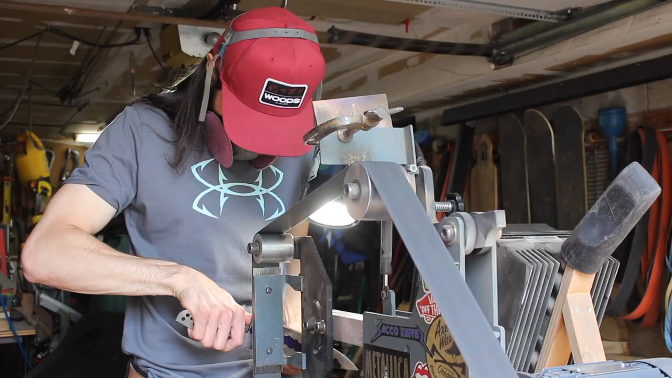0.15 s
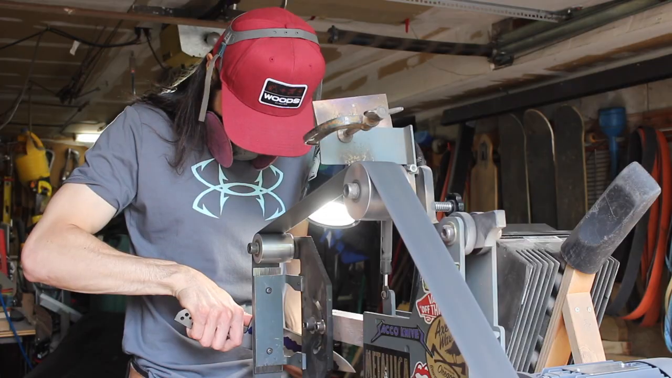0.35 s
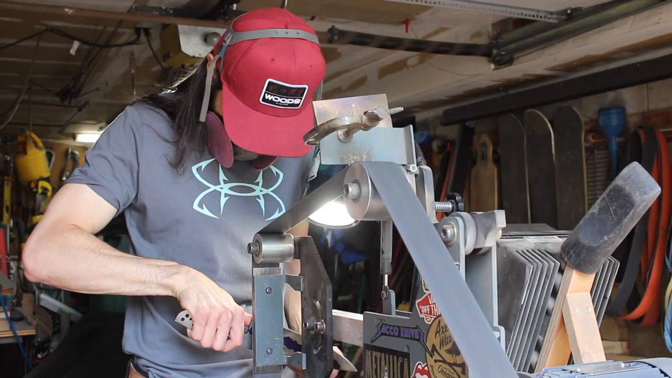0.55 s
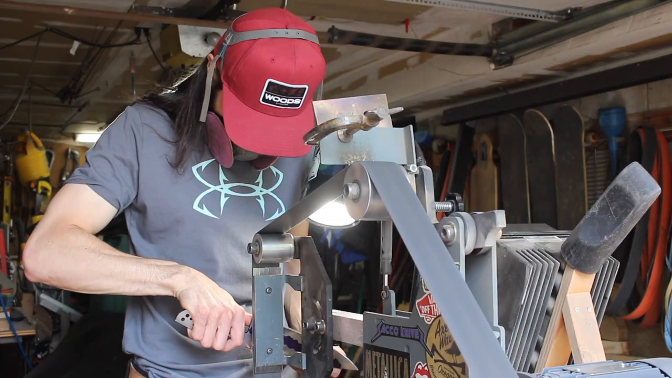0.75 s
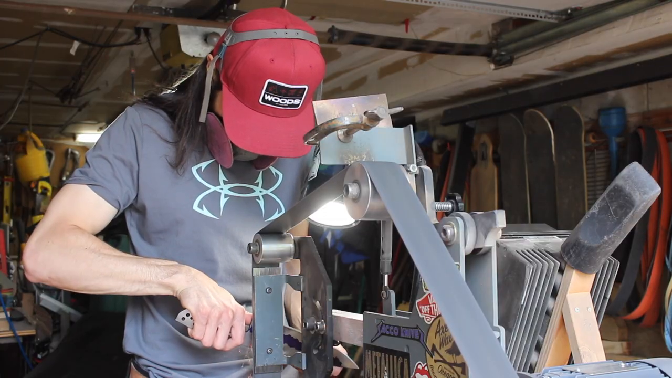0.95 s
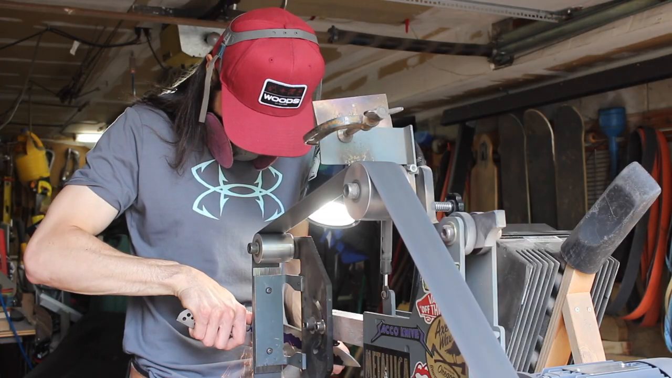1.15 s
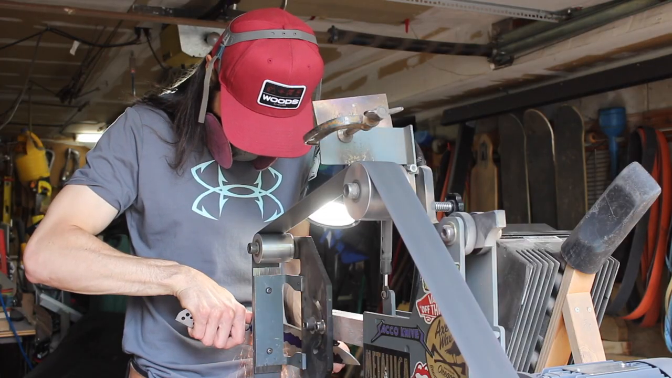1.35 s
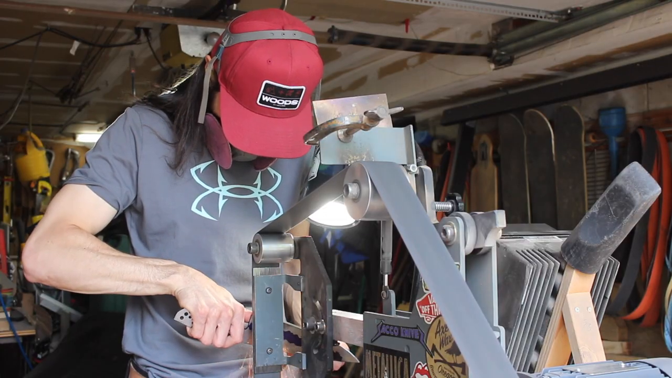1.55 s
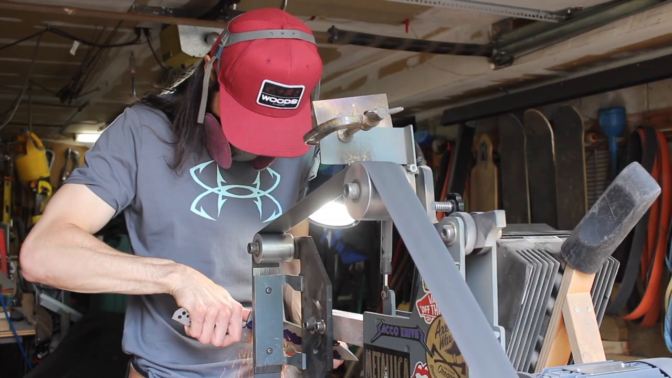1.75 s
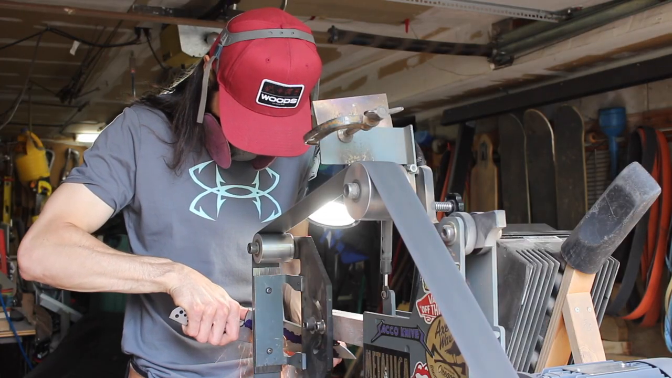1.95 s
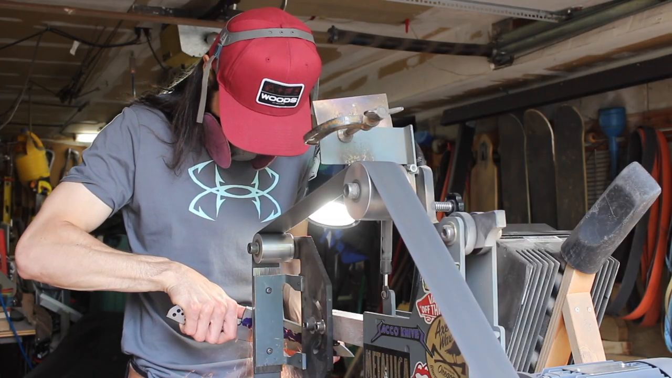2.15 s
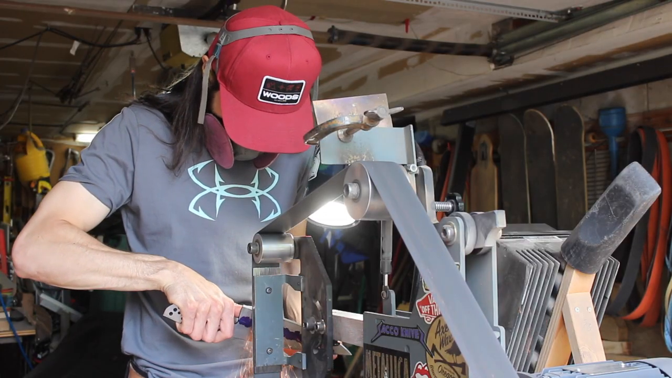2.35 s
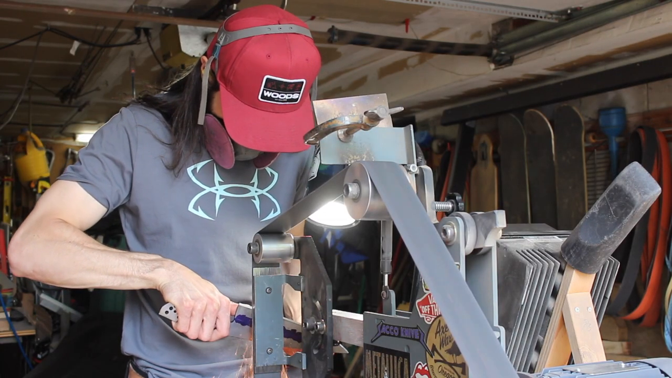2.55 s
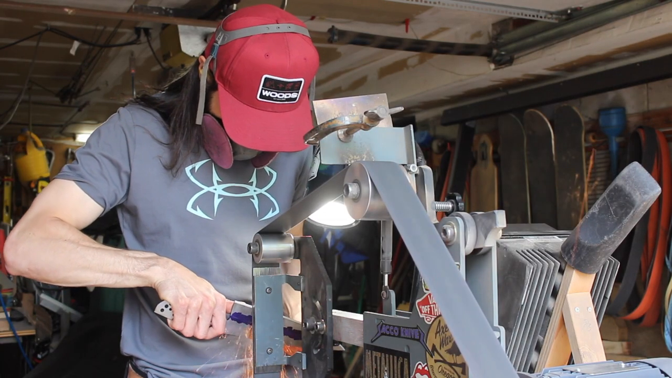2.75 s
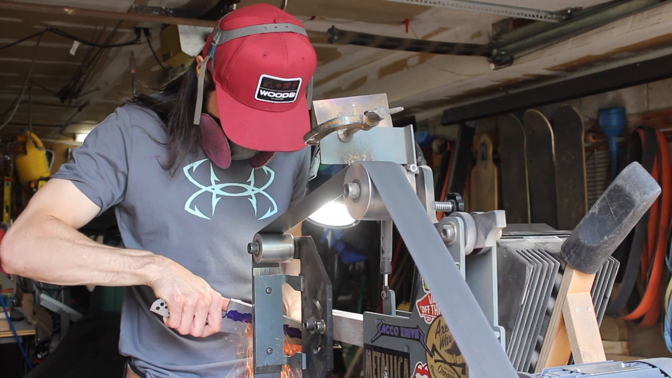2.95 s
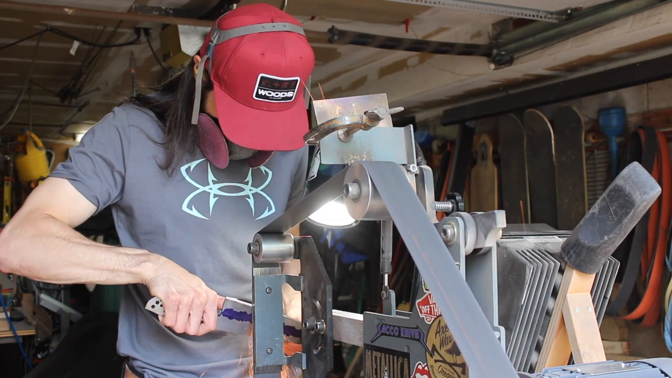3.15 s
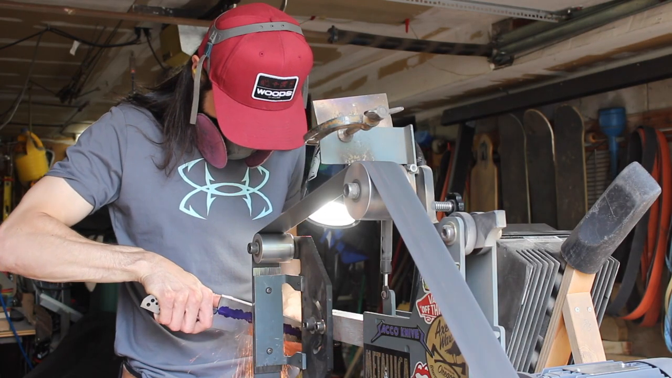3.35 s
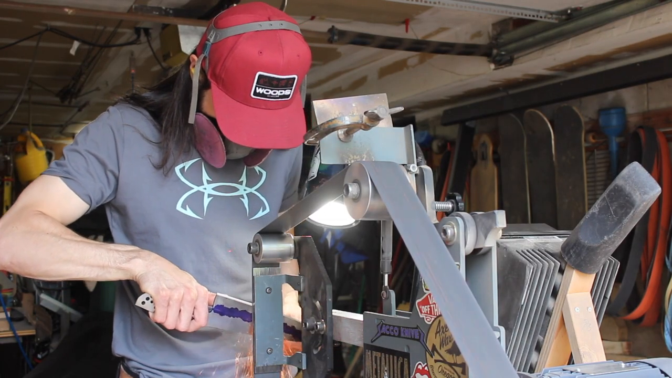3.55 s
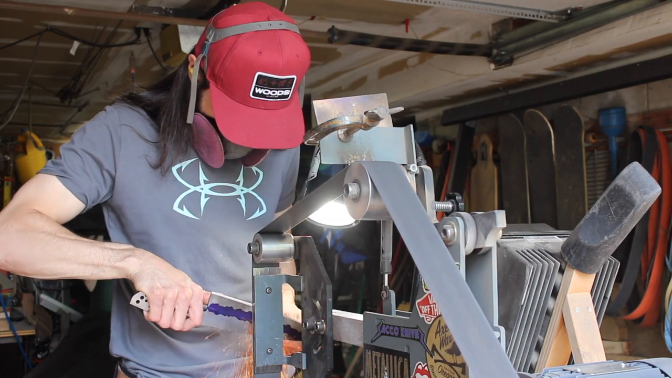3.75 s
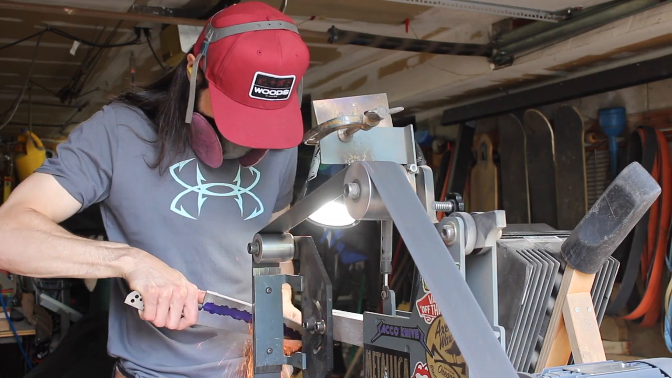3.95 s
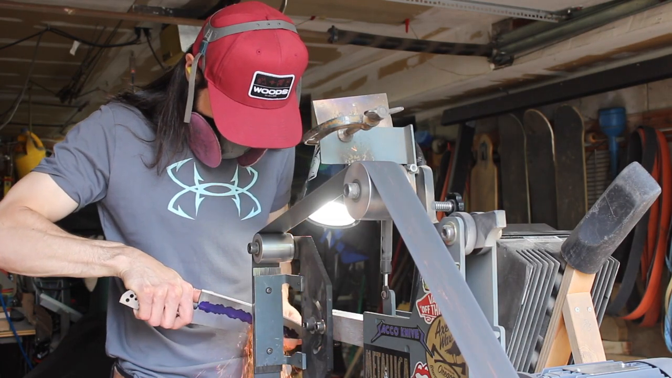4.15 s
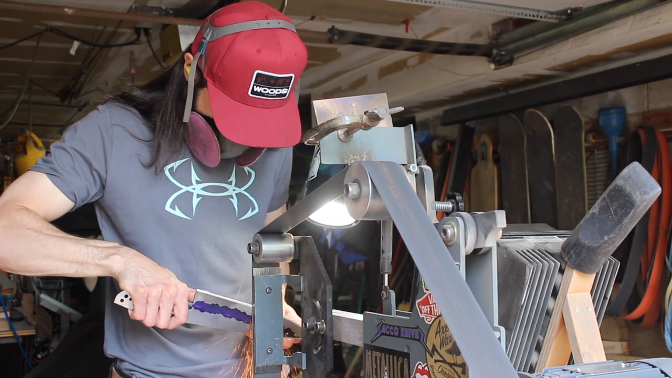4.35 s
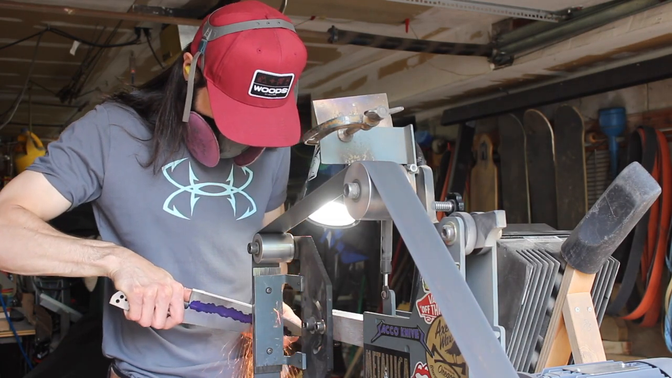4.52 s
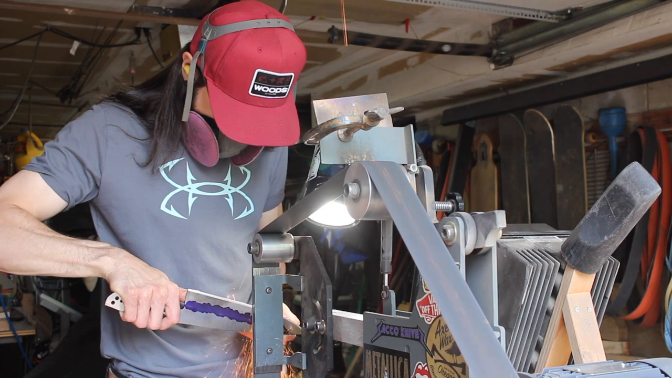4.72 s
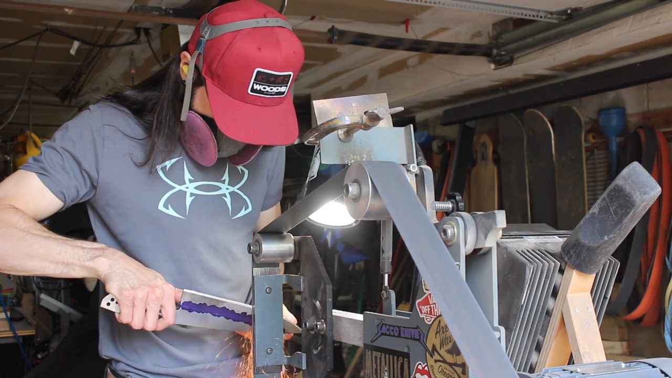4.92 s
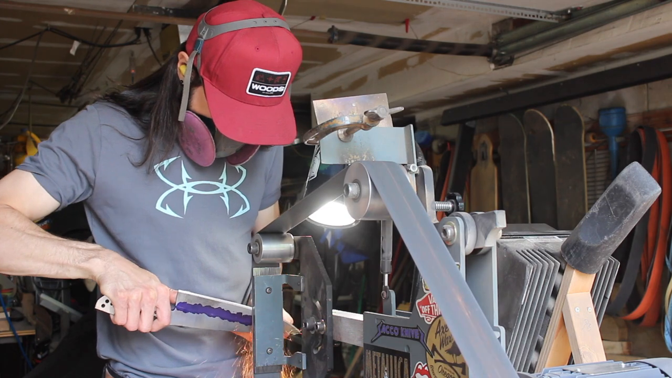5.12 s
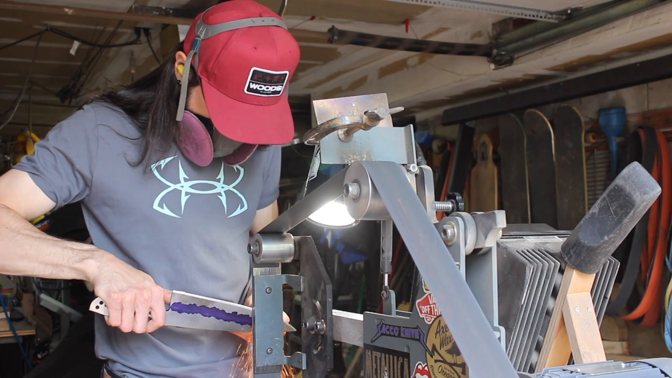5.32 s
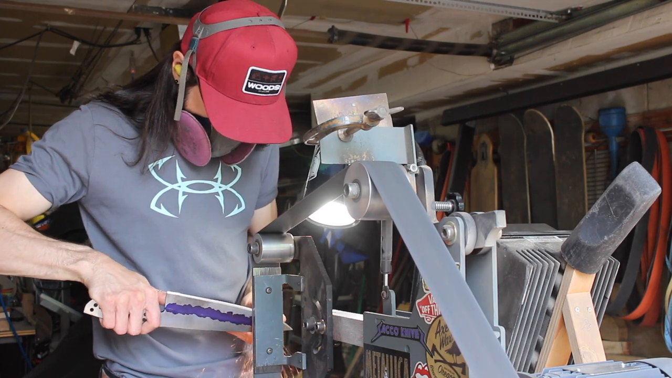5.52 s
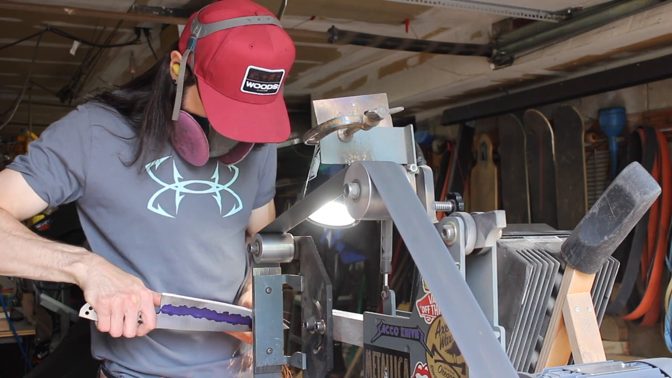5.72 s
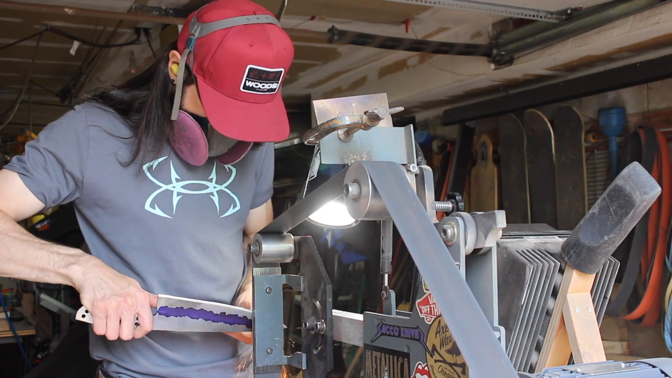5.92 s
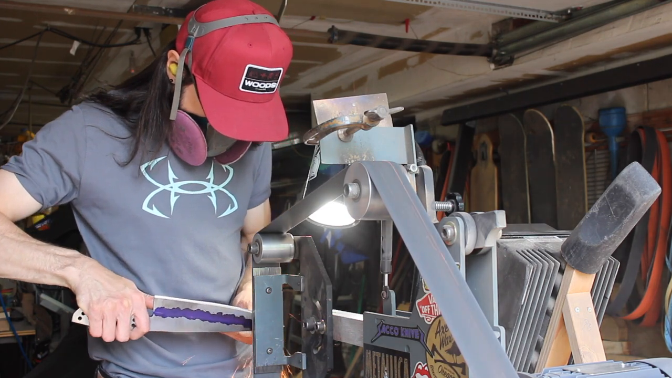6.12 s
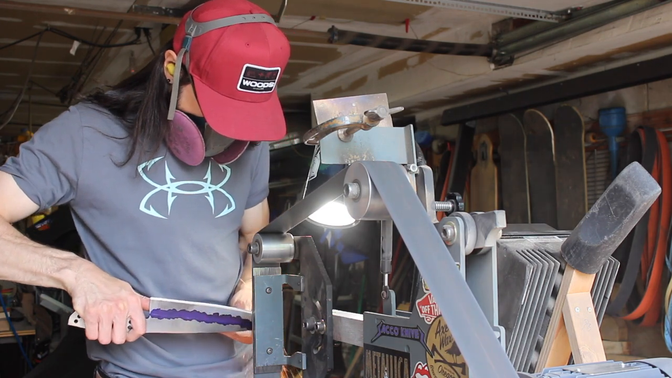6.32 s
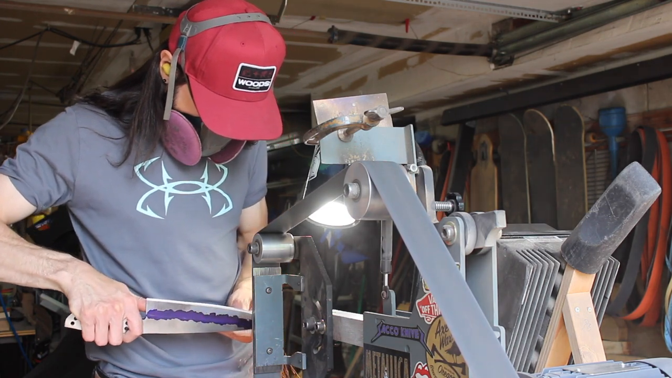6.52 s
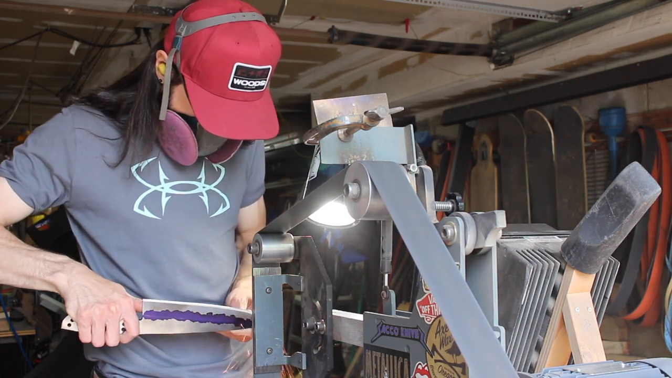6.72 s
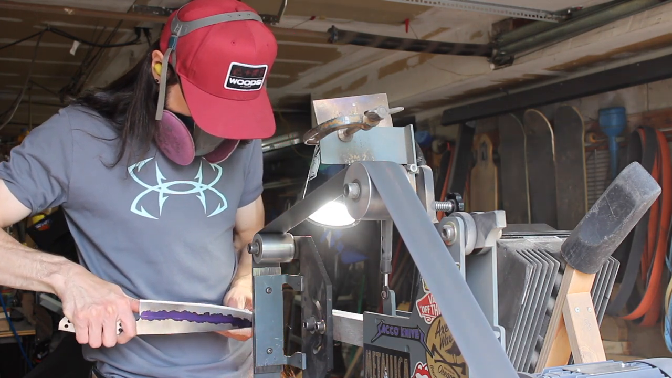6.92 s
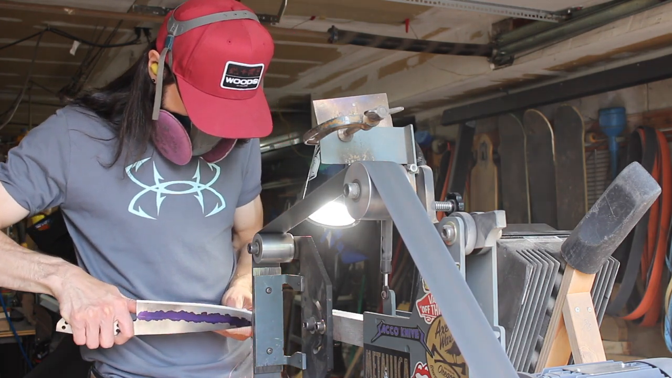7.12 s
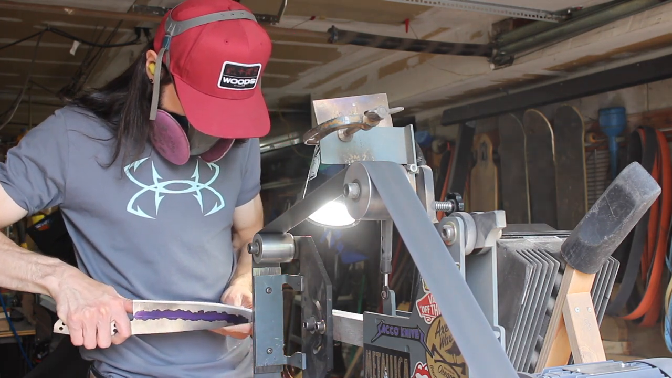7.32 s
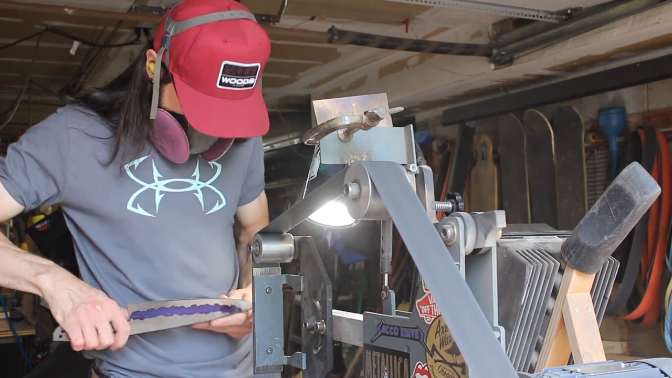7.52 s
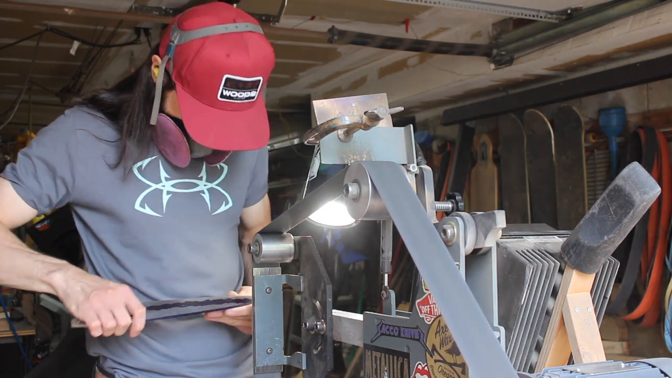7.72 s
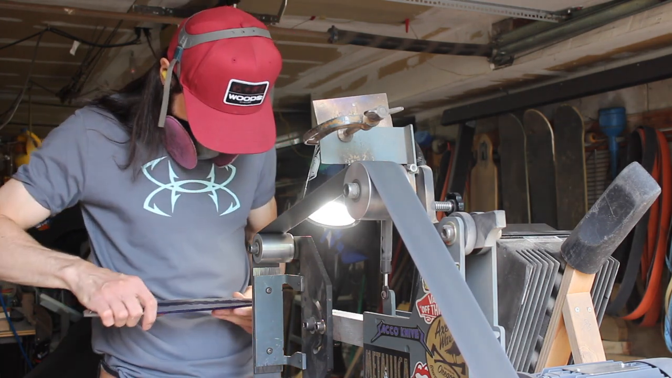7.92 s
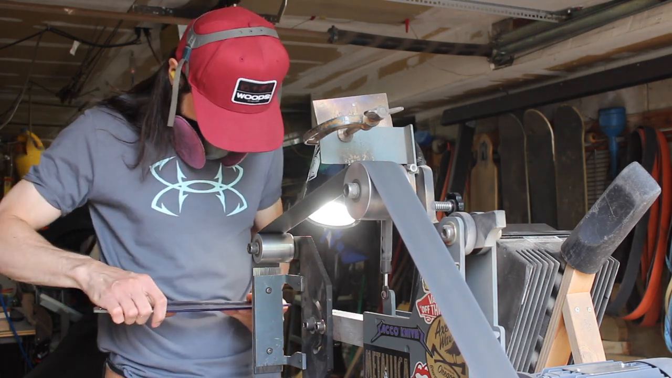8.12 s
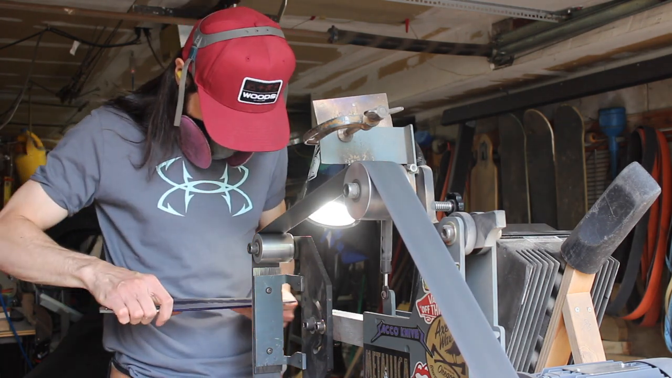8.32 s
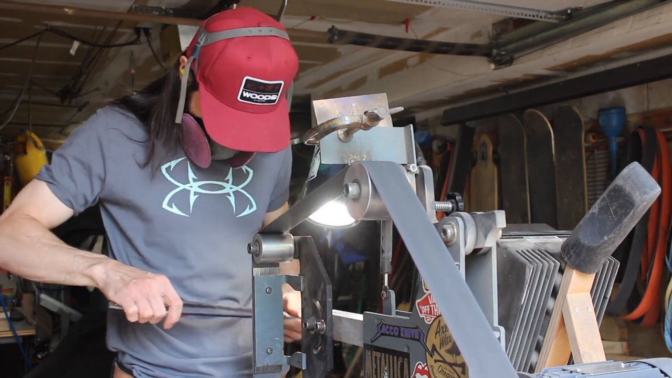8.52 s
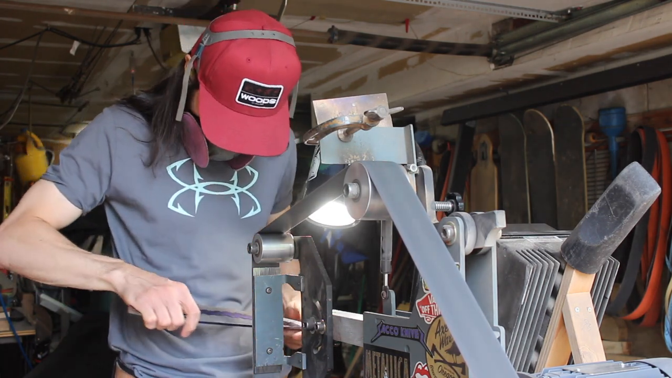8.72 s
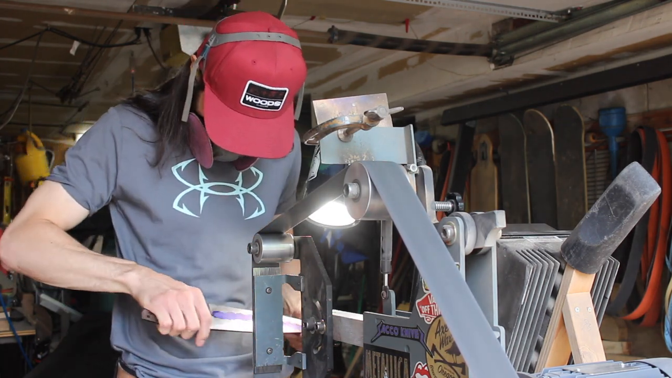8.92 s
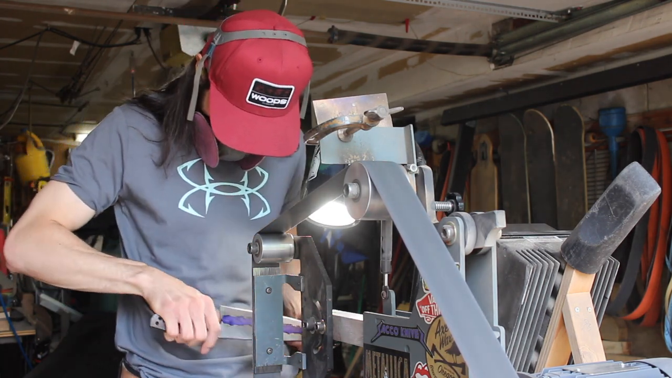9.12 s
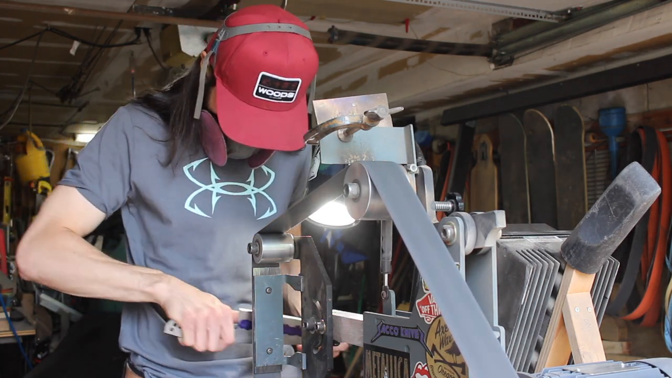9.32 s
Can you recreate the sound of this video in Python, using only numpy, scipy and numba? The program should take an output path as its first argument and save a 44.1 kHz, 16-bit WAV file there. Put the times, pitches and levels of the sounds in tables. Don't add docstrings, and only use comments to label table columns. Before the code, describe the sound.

Close, dry and almost mono: a belt machine whirs and hisses, its seam ticking about nine times a second. Short narrow scrapes lead into sustained harsh grinding of a knife, bright and sizzling, with resonant steel tones that swell and dip as the blade slides across. The grinding stops at once; the belt's hiss, faint hum and low air gusts on the microphone remain.

```python
import sys
import numpy as np
from scipy import signal
from scipy.fft import rfft, irfft, next_fast_len
from scipy.io import wavfile
from scipy.ndimage import uniform_filter1d
from numba import njit

SR = 44100
rng = np.random.default_rng(int(sys.argv[2]) if len(sys.argv) > 2 else 0)


def put_to_file(sound):
    columns = np.atleast_2d(sound).T
    safe = np.clip(columns, -1, 1)
    whole_steps = np.round(safe * 32767)
    wavfile.write(sys.argv[1], SR, whole_steps.astype(np.int16))


def rack_gain(trim_db):
    fader = np.asarray(trim_db, float)
    return 10 ** (fader / 20)


N = 417627
T_S = np.arange(N) / SR


def rms_one(x):
    return x / np.sqrt(np.mean(x ** 2) + 1e-20)


def in_time(rows):
    s, *columns = np.transpose(rows)
    return [np.interp(T_S, s, c) for c in columns]


def at_hz(points, hz):
    table_hz, value = np.array(points).T
    return np.interp(np.log(hz), np.log(table_hz), value)


def coloured(x, gain):
    size = next_fast_len(N)
    hz = np.fft.rfftfreq(size, 1 / SR) + 1
    return irfft(rfft(x, size) * gain(hz))[:N]


def resonance(x, hz, width_hz):
    r, w = np.exp(-np.pi * width_hz / SR), 2 * np.pi * hz / SR
    return rms_one(signal.lfilter([1, 0, -1], [1, -2 * r * np.cos(w), r * r], x))


def sine(level_db, phase):
    return np.sqrt(2) * rack_gain(level_db) * np.sin(phase)


# t/s, rate/(turns/s)
BELT = [
    (0, 8.745),
    (1.1, 8.75),
    (1.7, 8.85),
    (2.7, 8.93),
    (5.5, 8.93),
    (6.2, 8.915),
    (7.4, 8.92),
    (7.6, 8.745),
    (9.47, 8.74),
]


def belt_rate():
    return in_time(BELT)[0]


def belt_lag():
    return (SR / belt_rate()).astype(np.int64)


# t/s, level/dB
GAIN = [(0, 0), (.33, -3.5), (.65, 0), (.9, -3), (1.2, -3.5), (3, -4.5), (5, -5.5), (6, -7), (6.8, -6),
        (7.45, -7), (7.9, 0), (8.15, 1), (9.47, 0.5)]


def gain_db():
    return in_time(GAIN)[0]


@njit
def recur(fresh, lag, kept):
    out = fresh.copy()
    for i in range(lag.max(), len(out)):
        out[i] = kept * out[i - lag[i]] + np.sqrt(1 - kept * kept) * fresh[i]
    return out


# f/Hz, share/1
REPEATS = [(200, 0.54), (1000, 0.6865), (2200, 0.89), (3400, 0.93), (5500, 0.11), (11000, 0.041)]


def grit(kept, rough_db):
    lag = belt_lag()
    fresh, loose, lumps = rng.standard_normal((3, N))
    clump_db = 1.5 * uniform_filter1d(lumps, size=40) * np.sqrt(40)
    loose = rms_one(loose * rack_gain(clump_db))

    def share(hz):
        return np.clip(at_hz(REPEATS, hz), 0, 1)

    again = coloured(recur(fresh, lag, min(kept, .97)), lambda hz: np.sqrt(share(hz)))
    new = coloured(loose, lambda hz: np.sqrt(1 - share(hz)))
    lumps = uniform_filter1d(recur(lumps, lag, 1.0), size=500)
    lumps = rms_one(uniform_filter1d(lumps, size=500))
    return rms_one((again + new) * rack_gain(rough_db * lumps))


LIFT_S = 7.405


def blade():
    drive = grit(kept=0.77, rough_db=0.3)
    return cutting(drive) + ringing(drive) + touches(drive)


# f/Hz, density/(dB per Hz)
CUT = [(410, -54), (700, -12.5), (1370, -11.5), (1950, -5.5), (2160, 2.5), (2870, -2), (3450, 0.5),
       (4130, -5), (4520, 3), (6180, -3), (6760, 0), (8110, -8.5), (15500, -8.5)]


def cut_gain(hz):
    return rack_gain(at_hz(CUT, np.minimum(hz, 15400)))


# t/s, hiss level/dB, tilt of top over bottom/dB
CONTACT = [(.85, -32, 20), (1.2, -33.5, 24.5), (1.45, -25.5, 4), (1.8, -23.5, -2), (2.2, -24.5, -8.5),
           (3, -26, -12), (3.5, -25, -8.5), (3.85, -30, -9), (4.2, -24.5, -3.5), (5, -25.5, -4.5),
           (6.2, -26, 2), (6.6, -23.5, -2), (7, -27.5, 3), (7.39, -25, 0)]


def cutting(drive):
    lift_db_per_s = 896
    cut_db, tilt_db = in_time(CONTACT)
    cut_db = cut_db - lift_db_per_s * np.maximum(T_S - LIFT_S - .025, 0)
    hiss = rms_one(coloured(drive, cut_gain))
    low = coloured(hiss, lambda hz: 1 / (1 + (hz / 4500) ** 2))
    high = hiss - low
    return rack_gain(cut_db) * (low * rack_gain(-tilt_db / 2) + high * rack_gain(tilt_db / 2))


def antinodes(db, s, spacing_s, reach_s):
    node_db = 10
    dip_db = node_db * np.sin(np.pi * (T_S - s) / spacing_s) ** 2
    return db - dip_db - 6 * ((T_S - s) / reach_s) ** 2


# f/Hz, width/Hz
RING_WIDTH = [(540, 39), (1150, 39.16), (2200, 22.99), (4400, 33.43), (8600, 65), (15200, 50.7)]
# f/Hz, level/dB, best antinode t/s, antinode spacing/s, reach for 6 dB/s
RINGS = [(518, -35.5, 2.6749, 1.7, 1.2), (566.87, -39.5, 4.84, 5.0, 1.95),
         (900, -48.5, 2.554, 5.86, .8), (1155.7, -45.5, 4.971, 4.6, 1.5), (1584, -46, 6, 5.0, 0.5526),
         (1826, -39.5, 6.584, 3.292, 2.3352), (2225, -34.5, 6.53, 2.745, 3.5),
         (2560, -36.5, 6.8, 5.0, 0.8263), (2634, -34, 6.82, 3.4, 1.5), (3120, -33, 7.0225, 5.0, 0.3),
         (3549.1, -33, 4.07, 3.9, 0.4), (3522.2, -32, 7.24, 5.9, 0.5), (3605, -37, 5.473, 2.5, -2),
         (4430, -35.5, 3.75, 0.94, 1.0),
         (4427.6, -35.5, 6.929, 1.77, 6.0), (4440, -35, 1.85, 5.0, -0.1117),
             (4955, -35, 5.96, 1.95, 2.5), (5805.9, -37.5, 2.57, 1.274, 0.8),
             (5885, -31, 5.909, 0.8816, 1.2), (6576.2, -37.5, 2.5698, 1.2709, 3.5),
             (7345.6, -47, 1.5, .65, 2), (7346.6, -35, 7.346, 1.47, 2), (8500, -39, 6.8726, 2.3, 3.5),
             (9140, -39, 5.747, 1.15, 1.5434), (9140, -36, 1.45, 0.855, .55),
         (10160, -36, 3.7295, 1.552, 1.5), (10460, -36.5, 7.122, 1.27, 1.9),
             (11374, -40.5, 1.6, 1.0677, 2.5), (12300, -35, 4.5, 0.8794, .95), (13077, -45, 3.033, 5.0, .5),
             (14000, -46, 6.95, 2.05, 5), (14350, -39, 2.758, .66, -4), (15200, -33, 2.9, 1.055, -0.3)]
# f/Hz, width/Hz, t/s, level/dB, length/s
DAMPED = [(7100, 480, 1.46, -36, .47), (8760, 297.4, 1.6597, -33, 0.76), (3080, 220, 2.2, -37, 0.3707),
          (3350, 170, 3, -34, .68), (3070, 410.8, 4.4, -33.5, 0.88), (4620, 150, 5.78, -28.5, .36),
          (3730, 200, 5.66, -36, 0.1432), (2118.5, 109.3, 6.68, -38.5, 0.78),
          (2210, 21.36, 4.9454, -35.5, 0.61), (840, 201.2, 6.0876, -44, .43), (2524.7, 100, 5.3, -40, 0.24),
          (5157, 150, 1.21, -33, 0.129), (4390, 8, 3.0682, -33, .6), (4710, 30, 6.15, -36, 0.2098),
          (541, 50, 5.41, -38.5, 0.26), (3430, 81.5, 7.36, -34, 0.0905), (4540, 113.3, 4, -43, 0.19),
          (8400, 90, 5.851, -39, 0.13), (15200, 55, 4.92, -38.5, 0.411), (12226, 60, 7.2, -51, .3),
          (14330, 80, 4.019, -43, .25), (15190, 80, 3.83, -42, .3), (10151, 120, 1.45, -40.5, .25),
          (5837, 140, 5.05, -40, 0.27)]


def ringing(drive):
    bite_s, bite_db_per_s, lift_db_per_s = 1.2, 38.5, 380
    modes = np.zeros(N)
    for hz, db, *place in RINGS:
        modes += rack_gain(antinodes(db + 1.5, *place)) * resonance(drive, hz, at_hz(RING_WIDTH, hz))
    for hz, width_hz, s, db, length_s in DAMPED:
        swell_db = db + 1.5 - 6.274 * ((T_S - s) / length_s) ** 2
        modes += rack_gain(swell_db) * resonance(drive, hz, width_hz)
    modes = coloured(modes, lambda hz: 1 / (1 + (470 / hz) ** 10.0))
    lifted_db = lift_db_per_s * np.maximum(T_S - LIFT_S, 0)
    unbitten_db = bite_db_per_s * np.maximum(bite_s - T_S, 0)
    return modes * rack_gain(-lifted_db - unbitten_db)


# f/Hz, density/(dB per Hz)
TOUCH_BAND = [(2200, -45), (2600, -28), (2950, -6), (3280, 0), (3620, -5), (4050, -30), (4600, -45)]
# t/s, hold/s, level/dB, fade for 20 dB/s
TOUCH = [
    (0, .09, -26, .02),
    (.155, .05, -23.5, .02),
    (.25, .065, -23, .02),
    (.65, .01, -25, .03),
    (.715, .22, -24.5, .75),
]


def touches(drive):
    rise_db_per_s = 600
    levels = []
    for s, hold_s, db, fade_s in TOUCH:
        rise_db = rise_db_per_s * np.maximum(s - T_S, 0)
        fade_db = 20 * (np.maximum(T_S - s - hold_s, 0) / fade_s) ** 2
        levels.append(rack_gain(db - rise_db - fade_db))
    scrape = coloured(drive, lambda hz: rack_gain(at_hz(TOUCH_BAND, hz)))
    return np.max(levels, axis=0) * rms_one(scrape)


# t/s, f/Hz, level/dB
FLUTTER = [
    (3.9, 1140, -70),
    (4.2, 1145, -41.5),
    (4.8, 1160, -58.5),
    (5.4, 1190, -42),
    (5.65, 1175, -70),
]


def flutter():
    pitch_hz, level_db = in_time(FLUTTER)
    place = (np.cumsum(belt_rate()) / SR + 0.3824) % 1
    phase = 2 * np.pi * np.cumsum(pitch_hz + 90 * (.5 - place)) / SR
    return np.sin(np.pi * place) * sine(level_db, phase)


# f/Hz, density/(dB per Hz)
IDLE = [(71, -52), (120, -23), (346, -21), (383, -12.5), (541, -9), (748, -5), (1040, -10.5), (1350, -10),
        (1620, -10.5), (1830, -7), (3240, -0.5), (5060, 2), (6080, -6.5), (6730, -3), (15500, -12.5)]
# f/Hz, width/Hz, level/dB
FRAME = [(592.5, 57.56, -4), (780.7, 15, 0.5), (1632.9, 94.6, 0), (2161.6, 14, 2), (2564, 24, 8.5),
         (2970.1, 56.34, 0.5), (3200, 130, 8), (3570, 29, 13), (4120, 30, 9), (4380, 238.7, 1),
         (5000, 45, -7), (6700, 151.1, 0), (8200, 67.2, 2.5), (9150, 70, 3), (10400, 63, -25),
         (10800, 58, -30), (11800, 71, -46), (12400, 97, -14)]
# f/Hz, width/Hz, level/dB
STAND = [(264.16, 38, -69.5), (348, 13, -51), (426, 15, -52), (535.5, 27.45, -43.5), (607.6, 14.52, -46.5),
         (725.18, 16, -58), (755, 15.97, -48.5), (893, 8, -61), (1030, 9.9, -81), (5559.2, 50, -40),
         (5143.6, 42.64, -42)]


def machine():
    idle_db = -19.5
    drive = grit(kept=0.915, rough_db=0.0514)
    hiss = rms_one(coloured(drive, lambda hz: rack_gain(at_hz(IDLE, np.minimum(hz, 15400)))))
    rings = rms_one(sum(rack_gain(db) * np.sqrt(w) * resonance(drive, hz, w) for hz, w, db in FRAME))
    out = rack_gain(idle_db - 3.0) * (hiss + rack_gain(-11) * rings)
    out += sum(rack_gain(db) * resonance(drive, hz, w) for hz, w, db in STAND)
    return out + splice() + hum()


# f/Hz, width/Hz, level/dB, lag/s, length/s
SPLICE = [(3000, 100, -37, -.016, .022), (3170, 90, -32, -.01, .026), (3340, 110, -33, -.002, .02),
          (3520, 150, -34, 0.0, .018), (3700, 100, -29, .003, .017), (5000, 500, -35, 0.0, .015)]


def splice():
    passage_s, splice_db = 8.175, -.5
    rate = belt_rate()
    turns = np.cumsum(rate) / SR
    turns = turns - turns[int(passage_s * SR)]
    seam = recur(rng.standard_normal(N), belt_lag(), .6)
    out = np.zeros(N)
    for hz, width_hz, db, lag_s, length_s in SPLICE:
        since_s = ((turns - lag_s * rate + .5) % 1 - .5) / rate
        knock = resonance(resonance(seam, hz, 2 * width_hz), hz, width_hz)
        knock = knock / np.sqrt(.15 + uniform_filter1d(knock ** 2, size=400))
        out += rack_gain(db + splice_db - 6 * (since_s / length_s) ** 2) * knock
    return out


# f/Hz, level/dB
HUM = [(50, -62), (101, -60.5), (200, -64.5)]


def hum():
    tones = sum(sine(db, 2 * np.pi * hz * T_S) for hz, db in HUM)
    return rack_gain(0.8 * gain_db() + 2.0) * tones


# order/(cycles per turn), idle level/dB, loaded level/dB
WHEELS = [(19, -68, -65), (20, -68, -65), (35, -61, -61), (65, -49, -45), (77, -48, -47), (85, -44, -52),
          (101, -54, -52), (111, -52, -58)]


def wheels():
    rate = belt_rate()
    turns = np.cumsum(rate) / SR
    load = np.clip((rate - 8.75) / .18, 0, 1)
    tones = sum(sine(idle + load * (hard - idle), 2 * np.pi * order * turns)
                for order, idle, hard in WHEELS)
    return rack_gain(gain_db() * (1.5 - load)) * tones


# t/s, level/dB
DRAUGHT = [(.05, -60), (.26, -64.5), (1.27, -60), (1.42, -59), (1.998, -68), (3.06, -60), (3.75, -64),
           (4.35, -56.5), (4.48, -58), (4.64, -48), (5.38, -51), (5.75, -57), (6.28, -52), (6.46, -42.5),
           (6.78, -61), (7.57, -60), (8.17, -61.5), (8.5, -50.5), (8.8, -41), (9.03, -49), (9.26, -47)]


def draught():
    stir_db, gust_db_per_s = -69.5, 130

    def air_gain(hz):
        return (hz / 18) ** 2 / (1 + (hz / 18) ** 2) / (1 + (hz / 42) ** 3)

    air = rms_one(coloured(rng.standard_normal(N), air_gain))
    gusts = sum(rack_gain(db - gust_db_per_s * abs(T_S - s)) for s, db in DRAUGHT)
    return (rack_gain(stir_db + 0.941 * gain_db()) + gusts) * air


def scene():
    mono = blade() + flutter() + rack_gain(gain_db()) * machine() + wheels() + draught()
    return np.array([mono, mono])


def low_pass(x):
    return signal.sosfilt(signal.butter(12, 16600, fs=SR, output="sos"), x)


# t/s, level before a common 17 dB cut/dB
SPLIT = [(1.353, -7), (2.307, -19), (2.354, -8), (4.257, -12), (4.375, -14), (4.845, -11), (5.537, -17),
         (6.578, -10), (7.672, -9), (7.805, -7), (7.992, -14), (8.181, -17), (8.316, -9), (8.712, -15),
         (8.767, -15), (8.878, -11), (8.968, -14), (9.061, -13), (9.228, -11)]


def record(dry):
    top_hz, split_s = 15720, .045
    gate = sum(rack_gain(db - 17) * np.cos(np.pi * np.clip((T_S - s) / split_s, -.5, .5)) ** 2
               for s, db in SPLIT)
    treble = coloured(rng.standard_normal(N), lambda hz: (hz > 3800) * cut_gain(hz))
    wet = dry + gate * rms_one(treble) * [[1], [-1]]
    wet = np.array([coloured(c, lambda hz: hz < top_hz) for c in wet])
    return low_pass(wet)


dry = scene()
out = record(dry)
put_to_file(out)
```